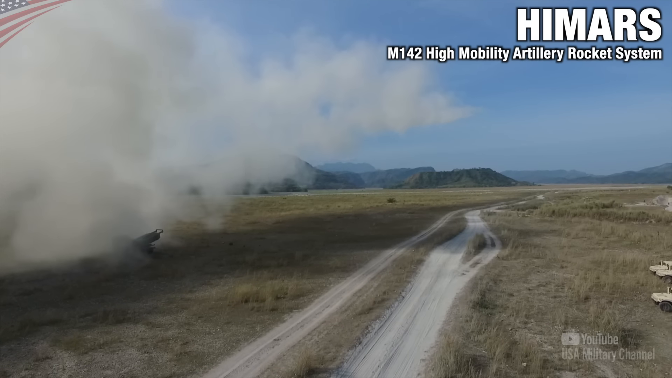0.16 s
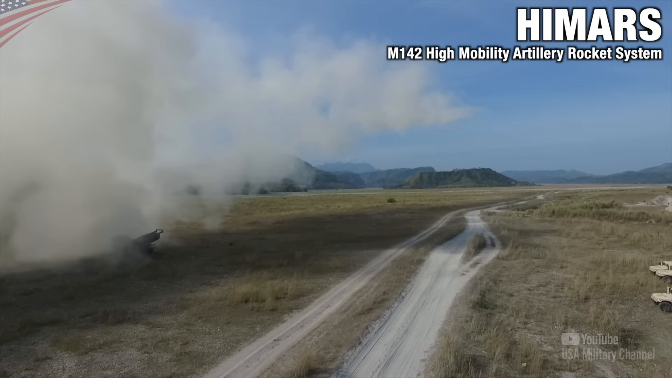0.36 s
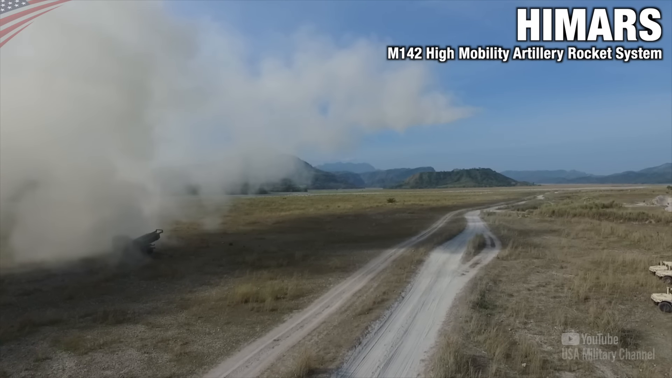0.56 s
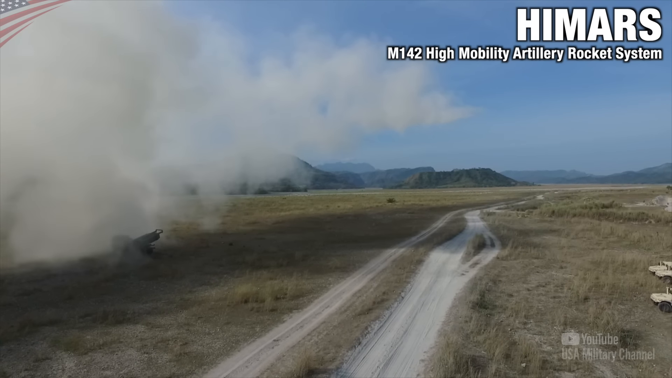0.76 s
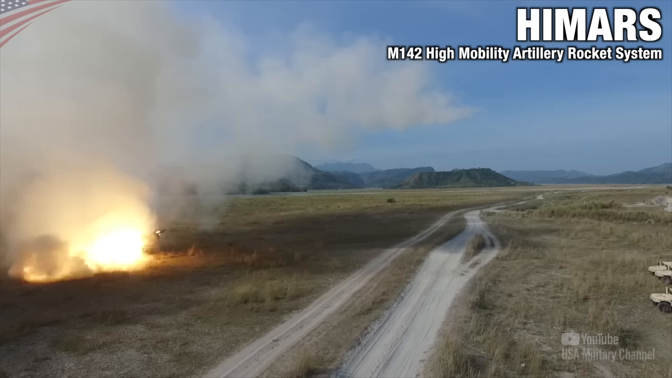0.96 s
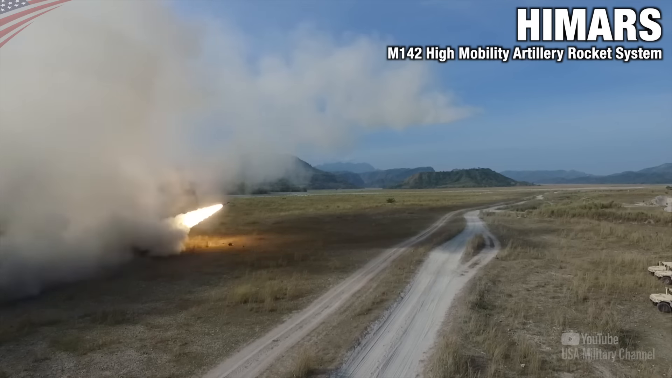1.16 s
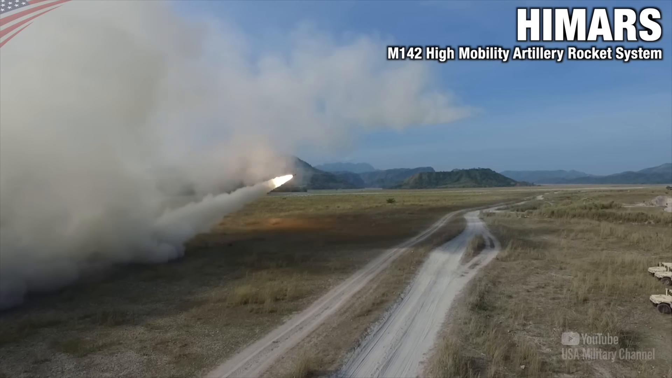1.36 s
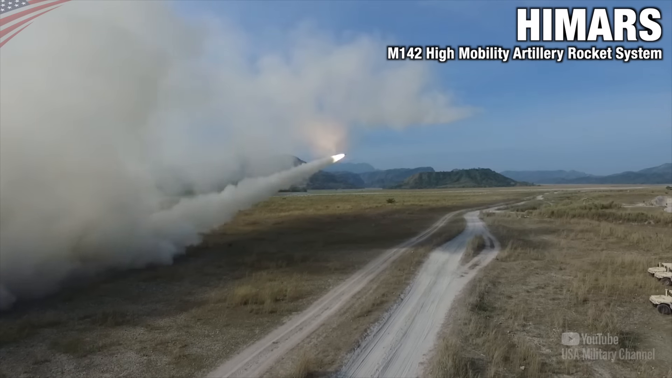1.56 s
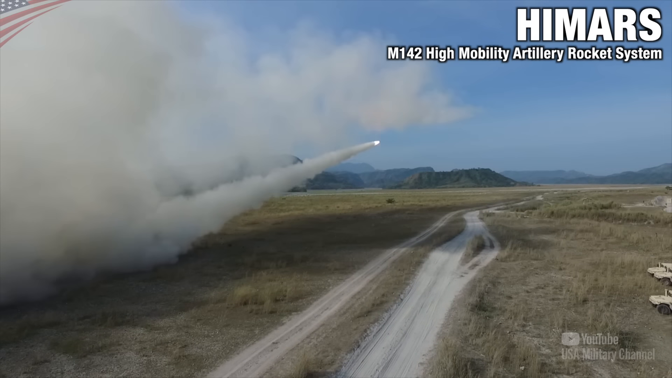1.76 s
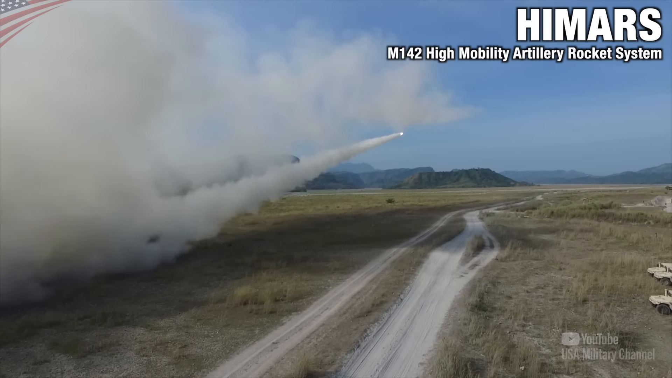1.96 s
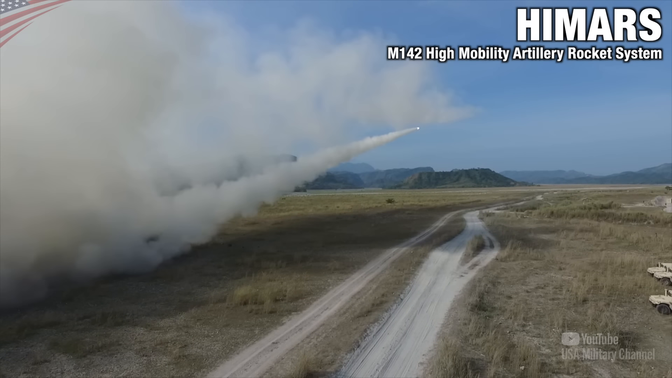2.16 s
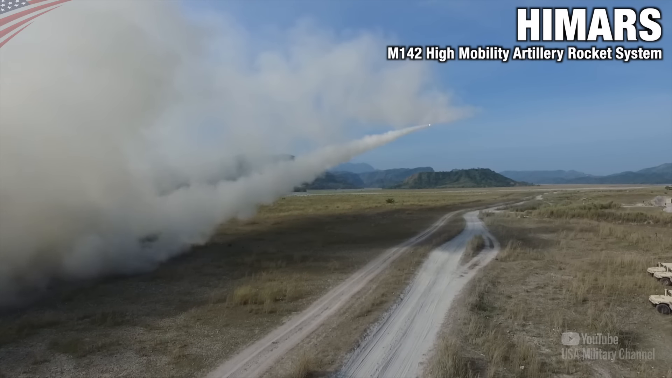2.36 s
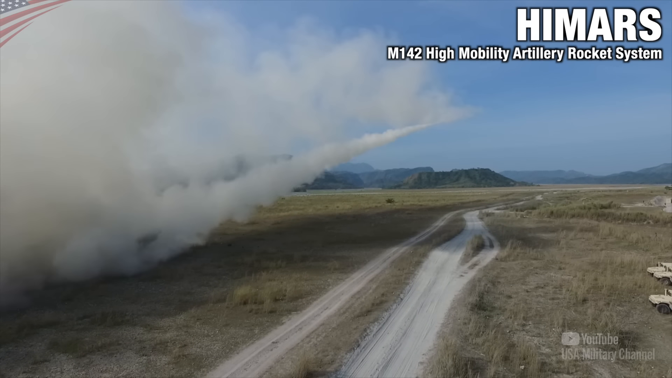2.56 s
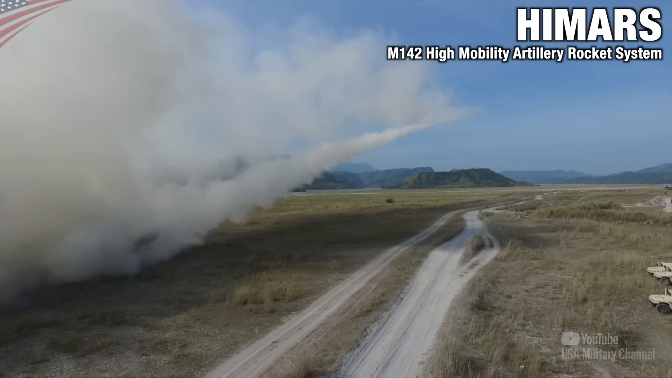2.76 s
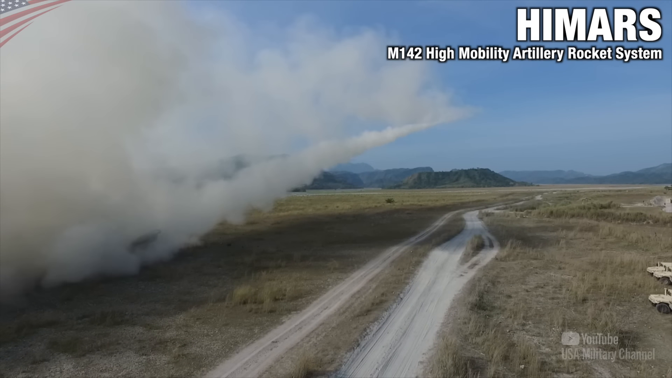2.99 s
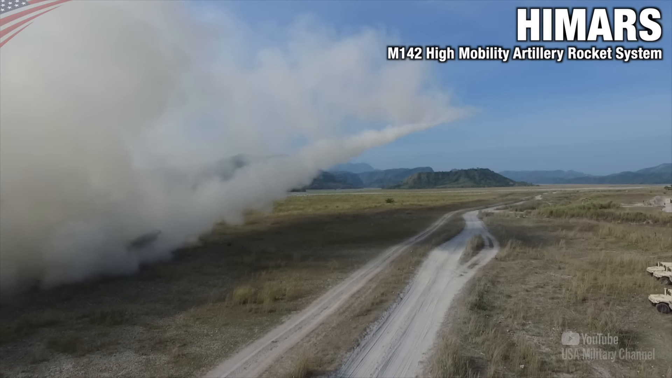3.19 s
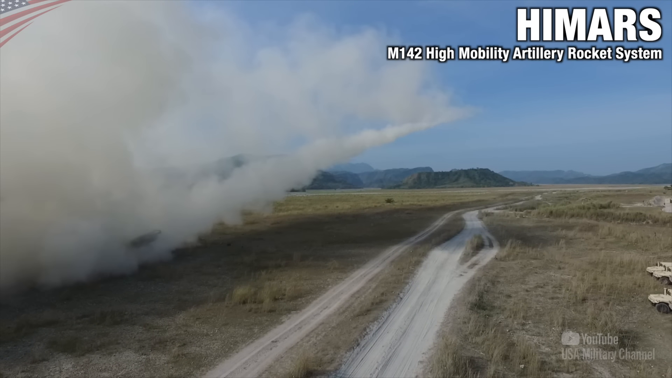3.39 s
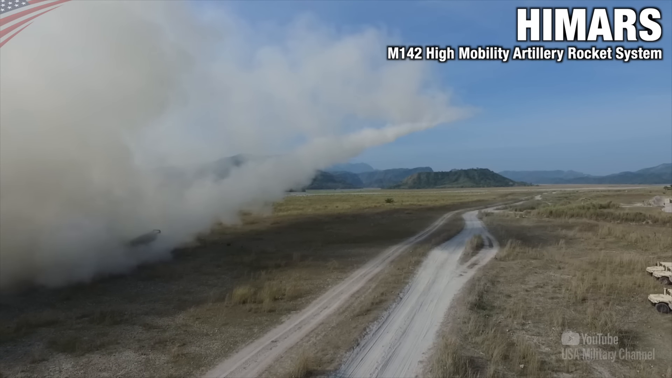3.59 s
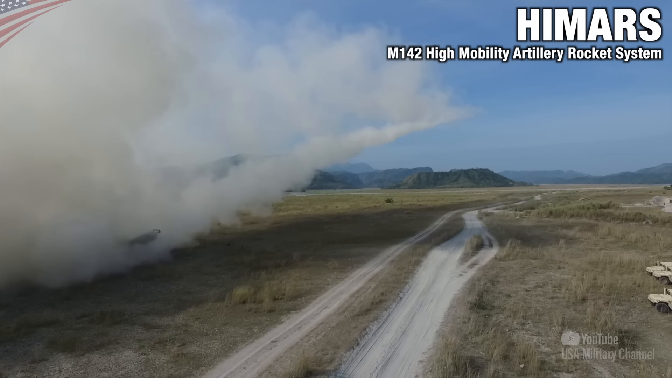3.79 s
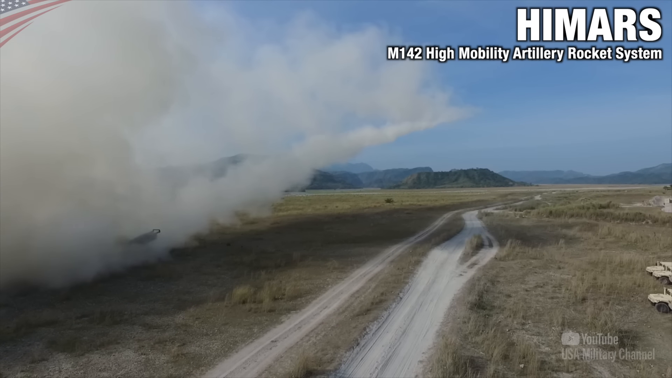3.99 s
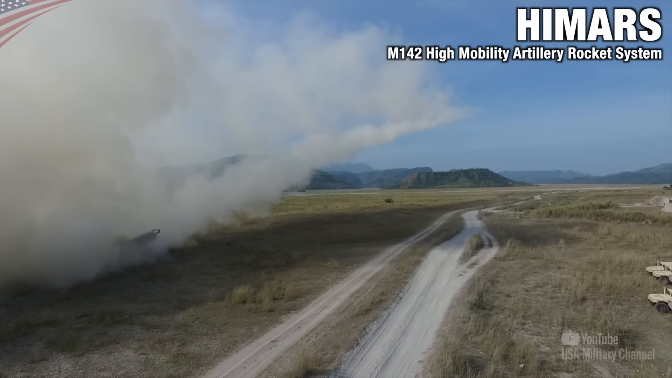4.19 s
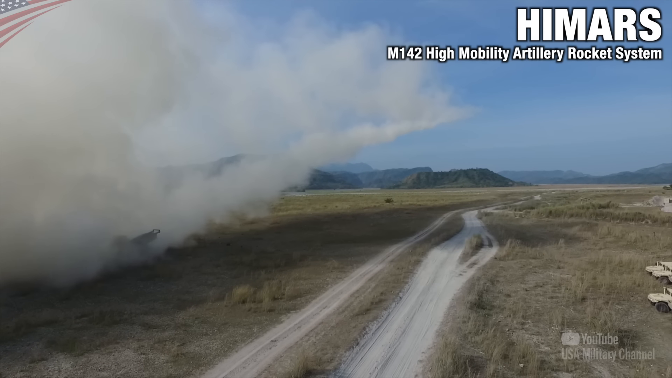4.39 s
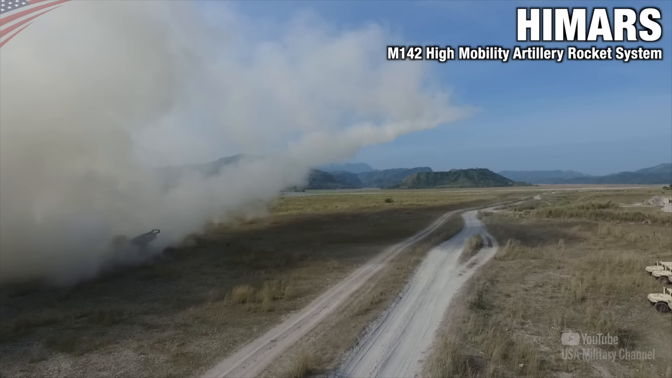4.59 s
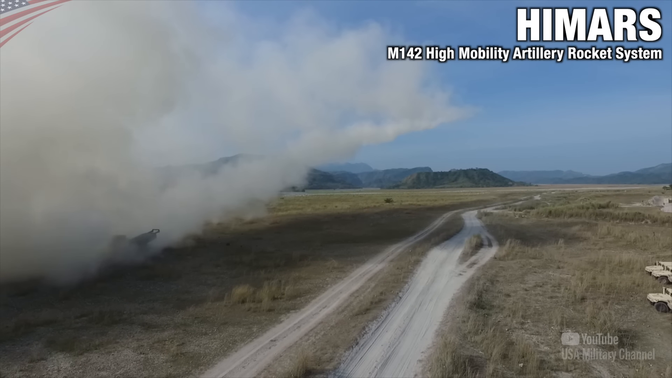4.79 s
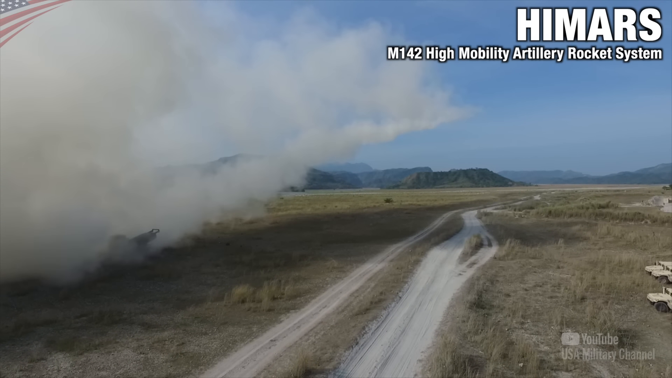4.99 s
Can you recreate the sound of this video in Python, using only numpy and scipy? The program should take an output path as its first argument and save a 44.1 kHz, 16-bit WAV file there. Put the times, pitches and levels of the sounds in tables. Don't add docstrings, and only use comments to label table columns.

```python
import sys
import numpy as np
from scipy import signal
from scipy.io import wavfile
from scipy.ndimage import uniform_filter1d

SR = 44100
rng = np.random.default_rng(int(sys.argv[2]) if len(sys.argv) > 2 else 0)


def decibels_to_gain(level_db):
    exponent = np.asarray(level_db, float) / 20
    return 10 ** exponent


def unload_wav(signal):
    wavfile.write(
        sys.argv[1],
        SR,
        np.round(np.clip(np.atleast_2d(signal).T, -1, 1) * 32767).astype(np.int16),
    )


N = 222502

IGNITION_S = 1.1228
TUBE_HZ = 200
LIMIT = .315
EDGE_HZ = 15150
SIZE, HOP = 1024, 256
HZ = np.fft.rfftfreq(SIZE, 1 / SR)[:, None]
T = np.arange(N // HOP + 5) * HOP / SR
FLOWN = np.maximum(T - IGNITION_S, 1e-3)

# t/s, peak level above 9 kHz/dB
SHOCK_FRONTS = [(1.809, -28), (1.873, -30), (1.904, -29), (1.931, -32), (1.957, -28.5), (2.2376, -28),
                (2.2505, -29.5), (2.279, -28.5), (2.3, -28), (2.2854, -23.5), (2.367, -38), (2.392, -28),
                (2.411, -26), (2.422, -27), (2.4304, -27), (2.443, -37), (2.4576, -31.5), (2.574, -28),
                (2.59, -27), (2.602, -27), (2.624, -41), (2.6538, -19), (2.8111, -50), (2.8374, -42),
                (2.8457, -35), (2.8644, -46), (2.865, -39), (2.879, -46.5), (2.8904, -54), (2.906, -37),
                (2.914, -48), (2.948, -59.5), (2.982, -42), (3.001, -42), (3.013, -42), (3.0244, -52),
                (3.031, -41), (3.049, -45), (3.0654, -49), (3.1546, -55)]


def jet():
    # t/s, roar level/dB, bearing (1 beside the jet, 0 behind it), roar centre f/Hz
    flight = [(1.13, -15, 0.8, 680), (1.25, -13, 0.83, 665), (1.34, -15, 1, 980), (1.5, -5, 0.31, 647),
              (1.7, 0, 0.036, 457), (1.95, -4.5, 0.16, 407), (2.2, -10, 0.083, 400),
              (2.42, -15.5, 0.04, 445), (2.72, -17.5, -0.061, 450), (3.08, -23.5, 0.11, 480),
              (3.3, -28.5, -0.15, 385), (3.52, -33, 0.028, 448), (3.9, -33, -0.19, 432),
              (4.15, -34.5, 0.0052, 560), (4.36, -36.5, -0.019, 550), (4.54, -45, 0.31, 560),
              (4.66, -46.5, 0.22, 454), (5.04, -52, 0.39, 421)]
    roar_db, beside, roar_hz = curve(flight)
    air_db = -(4 + 2.5 * FLOWN ** 2) * (HZ / 7000) ** 1.67
    power = large_eddies(roar_db, beside, roar_hz, air_db)
    power += tube_boom()
    power += small_eddies(roar_db, beside, air_db)
    patches_db = 1.0 * drift(bins=12, frames=10)
    patches_db = patches_db + 1.2 * drift(bins=300, frames=3) * np.minimum(HZ / 3000, 1.5)
    sound = noise(np.sqrt(power) * decibels_to_gain(ground_ripple() + patches_db))

    t = np.arange(N) / SR
    size = np.interp(t, T, np.sqrt(power.sum(0)))
    skew = np.interp(t, T, .02 + .4 / (1 + (FLOWN / .62) ** 3))
    shocks = size / skew * (np.exp(skew ** 2 / 2) - np.exp(-skew * sound / size))
    return shocks * np.clip((t - IGNITION_S) / .0004, 0, 1)


def large_eddies(roar_db, beside, roar_hz, air_db):
    # t/s, roar level/dB, rumble level/dB, length/s
    surges = [(1.41, 1.3, -5.5, 0.23), (1.647, -5, -3.5, 0.15), (1.942, 2, 3.5, 0.042),
              (1.991, -7, 2.5, 0.015), (2.08, -1, -5.5, 0.067), (2.293, 1, 4, 0.11),
              (2.351, -6.5, -2, 0.018), (2.426, -14, -4, 0.0078), (2.439, 8, 7, 0.0096),
              (2.566, -0.3, 5, 0.045), (2.64, 0.5, -3.5, 0.022), (3.694, -0.6, 5, 0.35),
              (3.59, -5, 5.5, 0.011), (4.022, -2, -1, 0.011), (4.11, .6, 4.5, 0.063), (4.143, -6, 2, 0.01),
              (4.17, 5, -6, 0.023), (4.33, 1.7, -2, 0.22), (4.477, 5, -6, 0.021)]
    at, surge_db, heave_db, length = np.transpose(surges)
    rumble_db = roar_db - 7.5 + 3 * FLOWN + swells(at, heave_db, length)
    rumble_hz = 123 + (190 - 123) * np.exp(-(FLOWN / .42) ** 2)
    body_db = roar_db + swells(at, surge_db, length)
    behind_db = -9.5 * np.clip(beside, 0, 1)
    core_db = body_db - 1.5 + .6 * roar_db + behind_db

    echo_sharp, lost_sharp = 16, 3.7
    sharp = 8.8 + (7.4 - 8.8) * np.clip(beside, 0, 1)
    sharp = sharp + echo_sharp * soft_step(T, 4.1, .06)
    sharp = np.maximum(sharp - (echo_sharp + lost_sharp) * soft_step(T, 4.58, .04), 4)

    power = banded(hump(rumble_hz, below=8.8, above=4.27), 40, 250, rumble_db)
    power += banded(hump(roar_hz, below=.43 * sharp, above=sharp) + air_db, 250, 1500, body_db)
    power += banded(hump(roar_hz, below=90, above=90), 250, 1500, core_db)
    return power


def small_eddies(roar_db, beside, air_db):
    # start t/s, end t/s, crackle level/dB, tearing level/dB
    gusts = [(1.276, 1.488, -0.9, 3), (2.145, 2.196, 0.5, 3.5), (2.203, 2.238, -2.5, -9),
             (2.238, 2.242, 12, 2.5), (2.272, 2.34, 5.5, 1), (2.405, 2.424, 3.5, 5),
             (2.428, 2.466, -1, -12), (2.554, 2.58, 2, 3), (2.64, 2.722, 8, 2), (2.837, 2.934, 7.5, 5.5),
             (2.927, 2.99, -8, -2), (3.008, 3.044, 1.5, 2), (3.05, 3.092, -4, 3.5), (3.13, 3.18, 3, 0),
             (3.214, 3.24, 11, 5.5), (3.298, 3.807, -0.5, 3), (3.54, 3.613, 3, 3.5), (3.81, 3.842, 6, -3),
             (3.96, 4.027, 2, -5), (4.1, 4.133, 8.5, 2), (4.147, 4.175, 3, 6), (4.157, 4.236, 4.5, 5),
             (4.25, 4.37, 1, 6), (4.305, 4.36, 6, -0.5), (4.394, 4.463, -0.5, -9), (4.49, 4.548, 5.5, 2)]
    start, end, gust_db, rip_db = np.transpose(gusts)
    tearing_db = roar_db - 12 + 13 * beside + plateaus(start, end, rip_db)
    crackle_db = roar_db - 16.5 + 19.5 * beside + plateaus(start, end, gust_db)
    sizzle_db = roar_db - 37 - 60 * np.maximum(T - 2.82, 0)
    power = banded(hump(1326, below=6, above=8.7), 1060, 2500, tearing_db)
    power += banded(hump(2640, below=14, above=1.61) + air_db, 2200, 5900, crackle_db)
    power += banded(hump(11000, below=30, above=4), 9000, 15000, sizzle_db)
    power += banded(hump(5500, below=12, above=30.5), 4500, 7000, roar_db - 35)
    return power


def tube_boom():
    boom_db = -11 - 6 * np.exp(-FLOWN / .078) - 193.5 * np.maximum(T - 1.24, 0)
    return banded(hump(TUBE_HZ, below=5, above=8), 40, 400, boom_db)


def ground_ripple():
    # f/Hz, level/dB
    ground = [(150, 1.5), (260, -2), (420, 0), (620, 0), (840, 1), (1150, -1), (1850, 1.5), (2700, -2.5),
              (3500, 2), (4300, 2.5), (5000, 0.5), (7000, -.5)]
    # f/Hz, level/dB
    ground_low = [(150, 2.5), (215, -4), (330, -0.5), (440, 2), (650, -5), (840, 3.5), (1020, 0.5),
                  (1300, 0)]
    clear = np.clip(FLOWN / 1.9, .35, 1)
    low = soft_step(T, 1.65, .1) - soft_step(T, 2.3, .089)
    return read(ground, HZ) * clear + read(ground_low, HZ) * low


def pops():
    out = np.zeros(N)
    for (s, db), steps in zip(SHOCK_FRONTS, rng.random((len(SHOCK_FRONTS), 60))):
        torn = steps ** 25
        front = np.convolve(blast(.0004), torn / np.linalg.norm(torn))
        out[round(s * SR):][:len(front)] -= decibels_to_gain(db + 20) * front
    return out


def slaps():
    # t/s, peak level/dB, pitch f/Hz
    hill_slaps = [
        (3.567, -23, 350),
        (3.593, -19, 140),
        (3.603, -23, 600),
        (4.026, -24, 500),
        (4.1305, -21, 140),
        (4.1465, -17, 650),
    ]
    out = np.zeros(N + SR)
    out[round(IGNITION_S * SR):][:2000] -= blast(.0008)
    t = np.arange(6000) / SR
    dull = signal.butter(4, 950, fs=SR, output="sos")
    for (s, db, hz), scatter in zip(hill_slaps, rng.standard_normal((len(hill_slaps), len(t)))):
        tail = .07 * scatter * decibels_to_gain(-60 * t / .1)
        echo = np.convolve(tail - (t == 0), blast(.16 / hz))
        echo = signal.sosfilt(dull, echo)
        out[round(s * SR):][:len(echo)] += decibels_to_gain(db) * echo / abs(echo).max()
    return out[:N]


def hoot():
    t = np.arange(N) / SR
    waver = uniform_filter1d(rng.standard_normal(N), size=500)
    waver = evened(uniform_filter1d(waver, size=500))
    shape = soft_step(t, 1.172, .008) - soft_step(t, 1.275, .013)
    turns = np.cumsum(TUBE_HZ * (1 + .08 * waver)) / SR
    return decibels_to_gain(-12.5) * np.sqrt(2) * shape * np.sin(2 * np.pi * turns)


def idling():
    # f/Hz, level per Hz/dB
    idle = [(15, -30), (30, -32.5), (75, 0), (150, 0), (260, -3), (480, -8.5), (1450, -14), (1650, -13),
            (2000, -13.5), (2400, -19.5), (5000, -27.5), (9000, -37), (12000, -42.5), (16000, -60)]
    # f/Hz, level/dB
    idle_tones = [(168, -71.5), (390, -71)]
    power = banded(read(idle, HZ), 0, SR, level_db=-56.5)
    out = noise(np.sqrt(power) * decibels_to_gain(.7 * drift(bins=8, frames=20)))
    for hz, db in idle_tones:
        waver, swell = (evened(uniform_filter1d(v, 5000)) for v in rng.standard_normal((2, N)))
        turns = np.cumsum(hz * (1 + .0078 * waver)) / SR
        out += decibels_to_gain(db + 1.2 * swell) * np.sqrt(2) * np.sin(2 * np.pi * turns)
    return out


def blast(seconds):
    u = np.arange(2000) / SR / seconds
    return (1 - u) * np.exp(-u)


def noise(size):
    a, b = rng.standard_normal((len(T), len(HZ), 2)).T
    spectra = size * (a + 1j * b) * np.sqrt(3 / 2)
    return signal.istft(spectra, nperseg=SIZE, noverlap=SIZE - HOP)[1][:N]


def drift(bins, frames):
    field = rng.standard_normal((len(T), len(HZ))).T
    field = uniform_filter1d(field, bins, 0)
    return evened(uniform_filter1d(field, frames, 1))


def banded(shape_db, lo, hi, level_db):
    power = decibels_to_gain(2 * shape_db) * np.ones(len(T))
    inside = (HZ[:, 0] > lo) & (HZ[:, 0] < hi)
    return power / power[inside].sum(0) * decibels_to_gain(2 * level_db)


def hump(hz, below, above):
    octaves = np.log2((HZ + 1) / hz)
    return np.maximum(-np.where(octaves > 0, above, below) * octaves ** 2, -140)


def soft_step(t, at, width):
    return (1 + np.tanh((t - at) / width)) / 2


def swells(times, lift_db, lengths):
    return np.exp(-((T[:, None] - times) / lengths) ** 2) @ lift_db


def plateaus(starts, ends, lift_db):
    t = T[:, None]
    return (soft_step(t, starts, .026) - soft_step(t, ends, .012)) @ lift_db


def evened(x):
    return x / np.sqrt(np.mean(x ** 2) + 1e-20)


def read(points, hz):
    f, value = np.transpose(points)
    return np.interp(np.log(hz + 1), np.log(f + 1), value)


def curve(rows):
    s, *columns = np.transpose(rows)
    return [np.interp(T, s, c) for c in columns]


def spectral_grit(x):
    t = np.arange(N) / SR
    fronts = np.transpose(SHOCK_FRONTS)[0]
    nearest = abs(T[:, None] - fronts).min(1)
    short = np.interp(t, T, np.clip((.022 - nearest) / .006, 0, 1)) * np.pi / 2
    long_change = rounded(x, size=2 * SIZE, group=1, coarser=1.55) - x
    short_change = rounded(x, size=SIZE // 4, group=8, coarser=1.1) - x
    change = np.cos(short) ** 2 * long_change + np.sin(short) ** 2 * short_change
    low_pass = signal.firwin(511, EDGE_HZ + 250, window=("kaiser", 8), fs=SR)
    change = signal.oaconvolve(x + change, low_pass, "same") - x
    since = t - IGNITION_S
    early = np.where(since > 0, 1, .15 * (since > -.004))
    return x + change * np.where(since < -.06, 1, early)


def rounded(x, size, group, coarser):
    frames = dict(window="cosine", nperseg=size, noverlap=size // 2)
    hz, _, z = signal.stft(x, SR, **frames)
    hz = hz[:, None]
    a, b = rng.standard_normal(z.T.shape + (2,)).T
    power = abs(z) ** 2
    block_level = np.sqrt(abs(uniform_filter1d(power.sum(0), size=group)))
    loud = np.minimum(1.5 * block_level / LIMIT, 1)
    near = uniform_filter1d(power, size=size // 64, axis=0)
    band = np.sqrt(abs(uniform_filter1d(near, size=group, axis=1)))
    masked = (decibels_to_gain(-39.5) * np.sqrt(2 * SIZE / size) * loud * LIMIT / (band + 1e-9)) ** .4
    step = coarser * loud * band * masked * np.clip((hz - 5000) / 6000, .01, 1) + 1e-12
    coarse = loud * (.17 + .3 * hz / 8000)
    noisy = z * (1 + coarse * (a + 1j * b))
    size_in = abs(noisy)
    size_out = np.maximum(step * np.floor(size_in / step + .46), .22 * size_in)
    kept = noisy / (size_in + 1e-12) * size_out
    return signal.istft(kept * (hz < EDGE_HZ), SR, **frames)[1][:N]


def scene():
    return np.tile(jet() + pops() + slaps() + hoot() + idling(), (2, 1))


def roll_off(x):
    return signal.sosfilt(signal.butter(12, 16370, fs=SR, output="sos"), x)


def record(dry):
    squared = np.clip(dry[0], -LIMIT, LIMIT)
    mix = np.tile(spectral_grit(squared), (2, 1))
    return roll_off(mix)


dry = scene()
out = record(dry)
unload_wav(out)
```